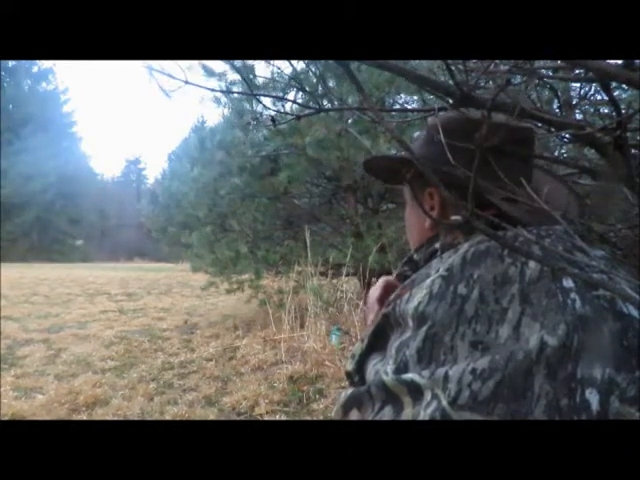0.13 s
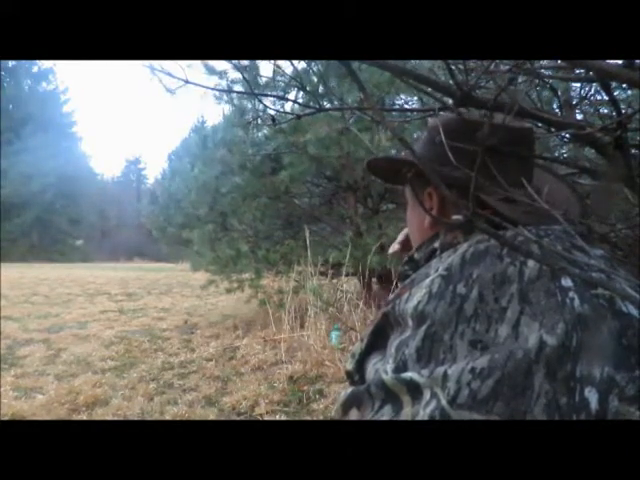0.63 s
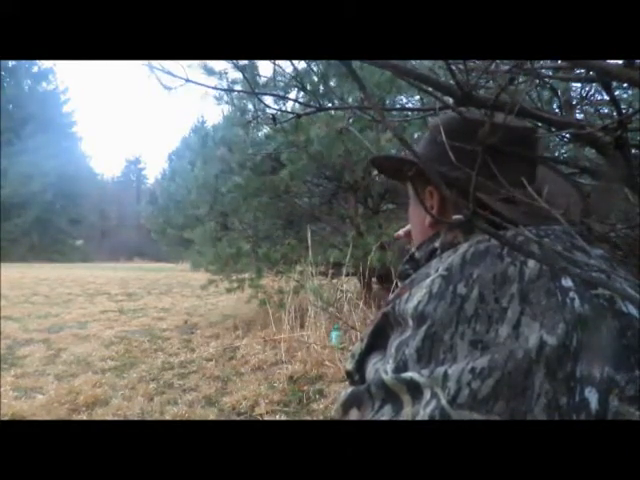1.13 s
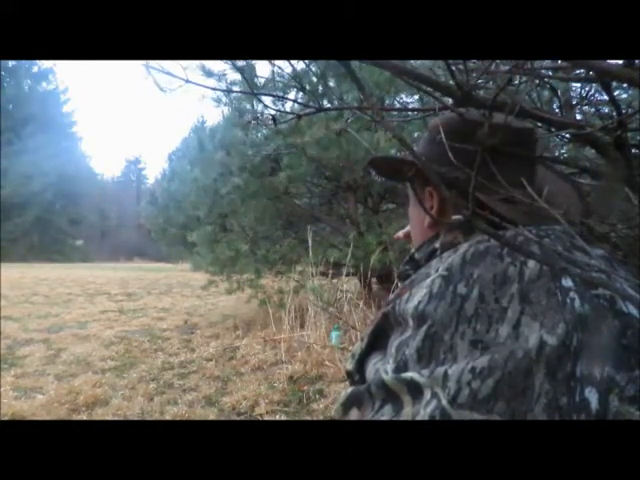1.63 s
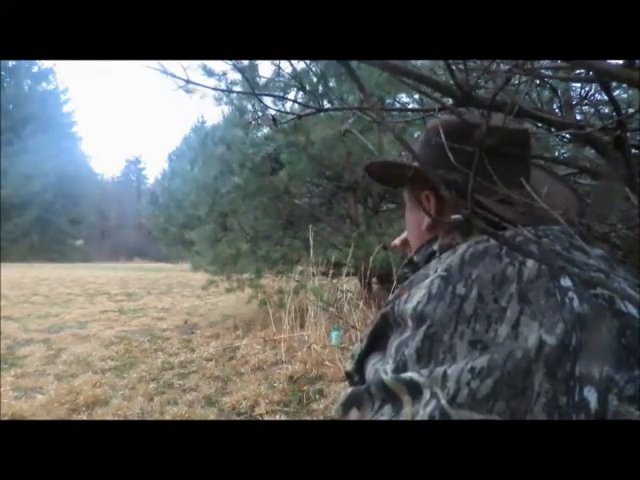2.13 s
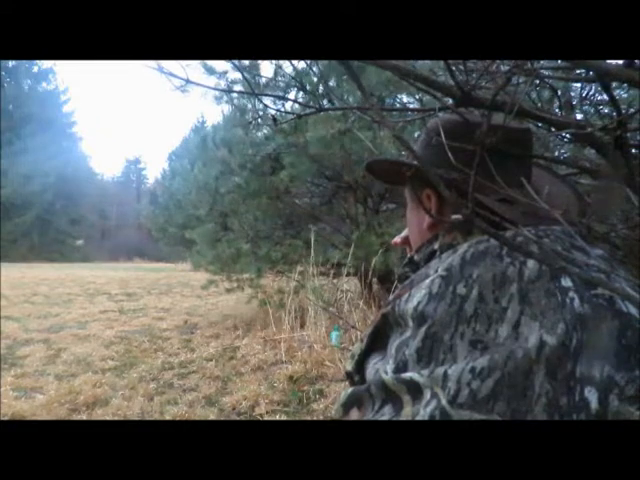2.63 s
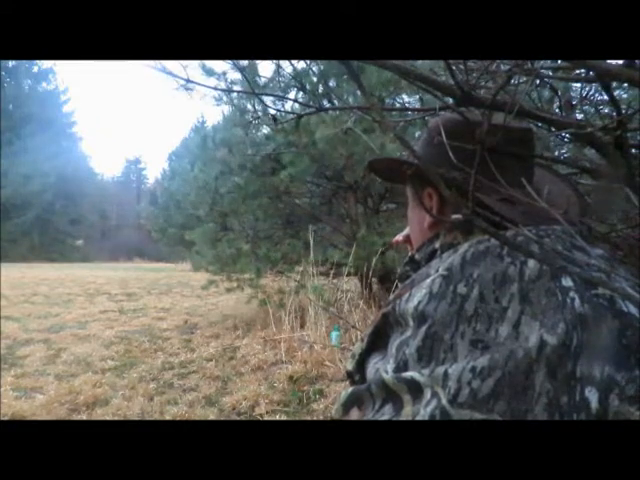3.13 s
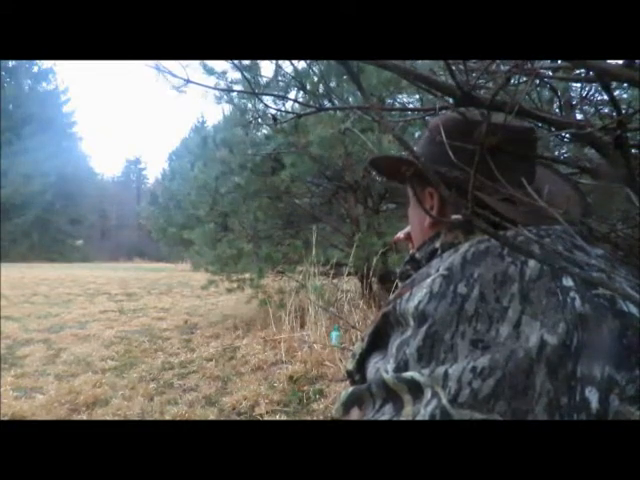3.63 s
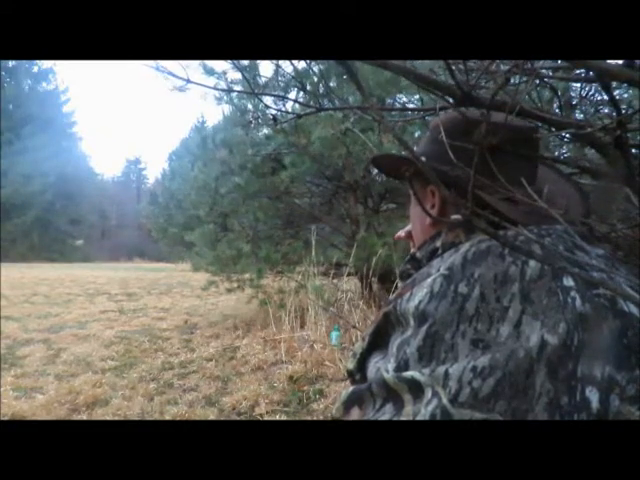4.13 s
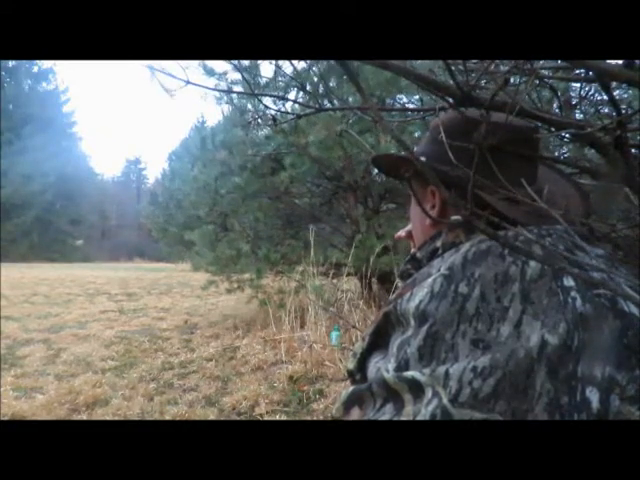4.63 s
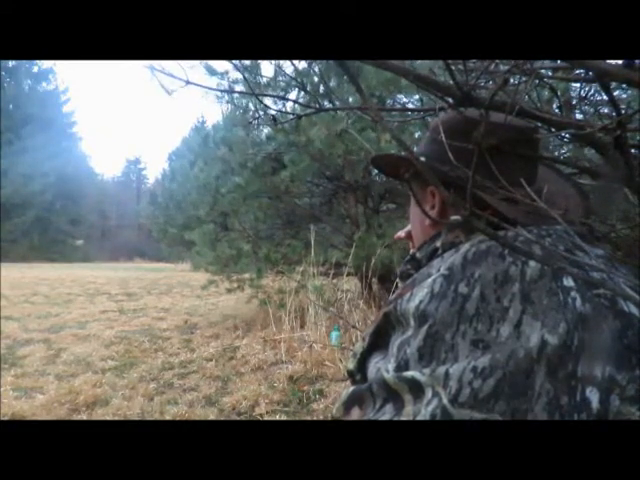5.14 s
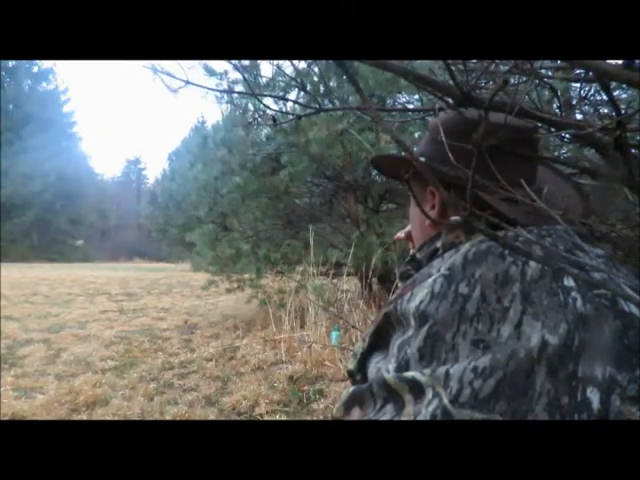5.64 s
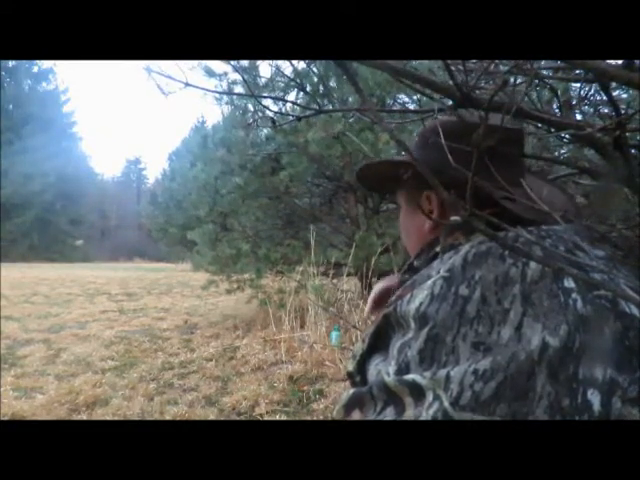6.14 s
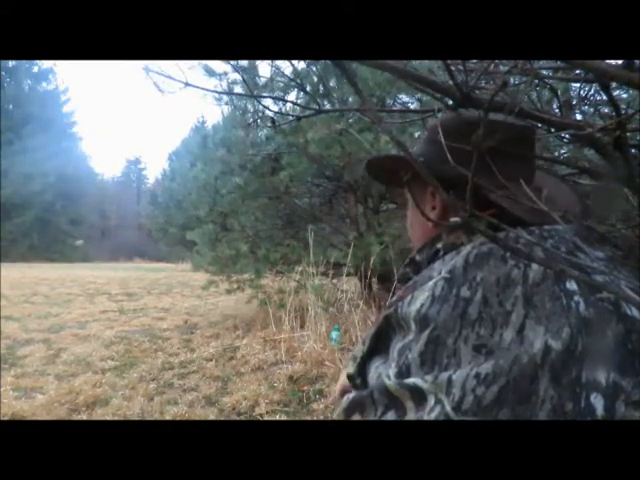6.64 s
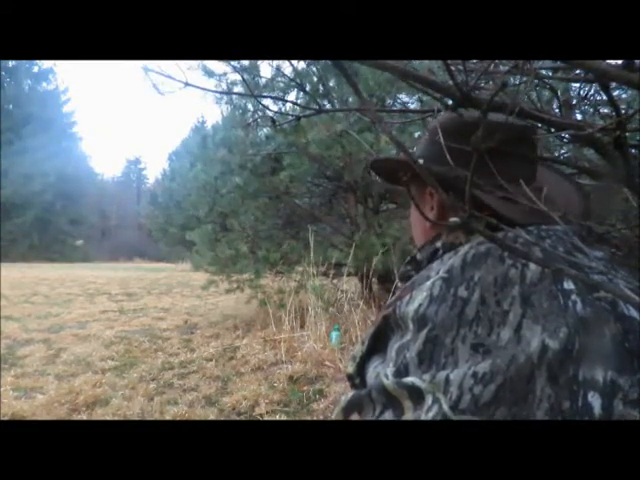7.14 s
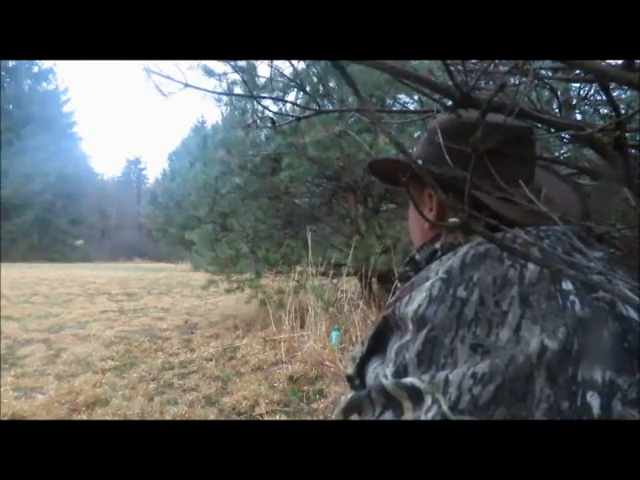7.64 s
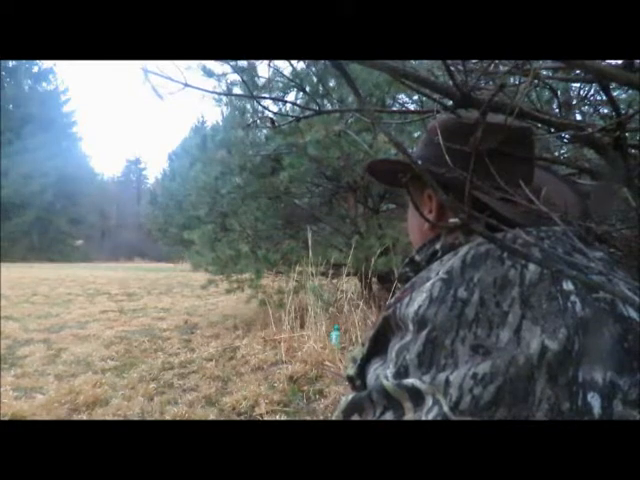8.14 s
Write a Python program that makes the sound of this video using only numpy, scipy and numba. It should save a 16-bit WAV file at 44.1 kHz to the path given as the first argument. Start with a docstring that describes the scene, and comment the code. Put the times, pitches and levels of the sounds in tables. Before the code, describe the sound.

A hunter's mouth turkey call gives six raspy yelps, then nine more, close up, over wind thumps and faint songbirds in an open field.

```python
"""At a field's edge a hunter works a hand-held turkey caller close to stereo microphones in the wind.
Gusts and eddies thump the ports from the start, over songbird whistles, a faint trill and a distant hush.
Six short yelps come first, then nine more: reed pulses ring a tube, and the tree line echoes them faintly.
After the last yelp the wind gusts again for about a second, the birds whistle on and another faint trill
is heard. The birds are gliding near-sines; wind, hush and trills are shaped noise."""
import sys
import numpy as np
from scipy import signal
from scipy.fft import rfft, irfft, next_fast_len
from scipy.io import wavfile
from scipy.ndimage import uniform_filter1d
from numba import njit

SR = 44100
rng = np.random.default_rng(int(sys.argv[2]) if len(sys.argv) > 2 else 0)


def dump_mix(stems):
    """Bounce the given channels to the path in sys.argv[1] as a 16-bit WAV at rate SR."""
    frames = np.atleast_2d(stems).T  # one column per channel
    limited = np.clip(frames, -1, 1)  # hard clip at full scale
    pcm = np.round(limited * 32767).astype(np.int16)
    wavfile.write(sys.argv[1], SR, pcm)


def voltage_ratio(decibels):
    """Convert decibels (scalar or array-like) to amplitude ratios, 20 dB per decade."""
    exponent = np.asarray(decibels, float) / 20
    return 10 ** exponent


N = 364707

# yelps of the caller: start_s, length_s, relative_peak_db, reed_rate_hz, slide_over_yelp_hz
YELPS = [(0.231, .1, -15.5, 624.4, 18), (0.564, .12, -12, 643.8, 35.5), (0.88, .119, -12, 646.6, 22.5),
         (1.197, .112, -12.5, 648, 25.5), (1.531, .109, -13, 638.4, 7), (1.828, .099, -12.5, 633.8, 30),
         (2.981, .057, -18.5, 550.8, 15), (3.176, .09, -11, 644.6, 45.5), (3.601, 0.1172, -11.5, 654, 54.5),
         (3.972, .155, -18.5, 628, -10.5), (4.37, 0.0985, -9.5, 641.5, 24),
         (4.695, .115, -15.5, 632.6, -4.5), (5.011, .107, -11.5, 623.8, -39),
         (5.341, 0.093, -15.5, 590.5, 0.5), (5.638, 0.11, -17.5, 588, -8)]
# how the caller is held: time_s, rasp (0-1), clearest_moment (share of the yelp),
# strong_weak_alternation (0-1), cupped_hand_opening (0-1), flick_on_letting_go_hz
GRIP = [(.28, 0.34, 0.79, 0.09, .05, 120), (.62, 0.78, 0.76, 0.06, .05, 150),
        (.94, 0.78, 0.78, .17, 0.3, 140.5), (1.25, 0.76, .7, .15, 0.51, 170),
        (1.581, 0.71, .5, 0.25, 0.4, 240.5), (1.88, 0.46, 0.75, 0.18, 0.52, 59.5),
        (3.01, 0.07, 0.13, 0.01, 0.4, 10), (3.22, 0.72, 0.51, 0.1, 0.72, 70.5),
        (3.66, .7, 0.53, 0.03, 0.52, 10), (4.05, .35, 0.27, 0.07, 0.84, 300),
        (4.42, .3, 0.46, 0.01, 0.82, -60), (4.75, 0.54, .4, 0.11, 0.78, -60),
        (5.07, .9, .3, .02, 0.65, -24.5), (5.39, 0.37, .45, .1, 0.69, -49.5),
        (5.7, 0.46, .42, 0.03, 0.85, -14.5)]
# moments when the reed catches: centre_s, half_span_s, level_change_db, rate_change_hz
CATCHES = [(.275, .012, -3.5, -95), (0.282, .005, -2.5, 1), (.633, 0.003, -2.5, 0),
           (0.908, .008, -2.5, -20), (0.95, 0.0055, -6.5, 0), (1.55, .004, -3, -20.5),
           (3.681, .005, -7.5, -0.5), (3.697, .007, 3, -1.5), (4.411, 0.01, -3.5, 0), (5.03, 0.0022, -6, 3),
           (5.396, 0.0092, -4.5, 1), (5.715, 0.0087, -3.5, -3)]
# main tube resonances, the fundamental's first: centre_hz, width_hz (second pass), relative_level_db
BODY_MODES = [(690, 503, 0), (1013, 140, -7.5), (1313, 326, 11), (1676, 370, -8)]
# upper tube resonances: centre_hz, width_hz (second pass), relative_level_db
BRIGHT_MODES = [(1950, 250, 2.5), (2280, 846, -1), (3162, 250, -7.5), (4220, 284, -9), (5140, 120, -27.5)]
# narrow passages colouring the leaking air: centre_hz, width_hz (second pass), relative_level_db
AIR_MODES = [(7370, 1100, -1), (8700, 820, -4.5), (10560, 1300, -6), (12700, 1700, -7)]
# slaps from the tree line: delay_s, level_db (against the dulled call)
ECHOES = [(0.041, -33), (.085, -43), (.2, -46), (.31, -48)]
# gusts on the ports: start_s, length_s, relative_strength_db
GUSTS = [(0, 0.057, -35.5), (0.148, 0.14, -26.5), (0.572, 0.15, -28.5), (0.839, 0.082, -17.5),
         (0.987, .12, -25.5), (1.129, 0.097, -29), (1.611, 0.07, -45.5), (2.783, 0.14, -43),
         (3.029, 0.23, -37.5), (4.121, 0.31, -42.5), (4.516, 0.35, -38), (4.9, 1., -43.5),
         (6.119, .24, -33.5), (6.443, .62, -43.5)]
# wind between gusts: time_s, relative_strength_db
LULL = [(0, -58), (1.4, -68.5), (2.6, -69.5), (3.5, -59.5), (7.1, -48.5), (8.26, -59.5)]
# single eddies on the ports: time_s (2 ms before the peak), peak_db (before the bass cut), pitch_hz (at the peak)
THUMPS = [(0.033, -13.5, 91), (0.182, -10.5, 149), (0.562, -29, 102), (0.673, -12, 130), (0.837, -7, 144),
          (0.855, -6, 219.6), (0.867, -27.5, 89.84), (0.995, -14.5, 129.8), (1.041, -12.5, 169.6),
          (1.055, -8, 217), (1.176, -14, 109), (4.118, -26, 159.2), (4.587, -21.5, 165.5),
          (4.681, -27, 163.1), (5.77, -26, 81.5), (6.222, -16.5, 111), (6.329, -20, 135),
          (7.032, -28.5, 97)]
# wind spectrum before filtering: frequency_hz, relative_density_db (per Hz)
WIND_SPECTRUM = [(29, -40.5), (50, -5), (97, 1.5), (233, -10), (477, -17.5), (600, -51.5), (780, -72.5),
                 (1320, -120)]
# whistles of songbirds: start_s, length_s, shape, from_hz, to_hz, level_db (before flutter and panning);
# an arch turns at its second pitch and comes back
BIRDS = [(0.335, 0.039, "arch", 2250, 2650, -52.5), (0.406, 0.063, "arch", 2150, 2200, -54),
         (.735, .033, "hook", 3460, 2620, -53), (.78, 0.075, "bend", 2930, 2030, -53.5),
         (0.804, 0.063, "arch", 3520, 4070, -61), (0.987, .044, "bend", 3000, 2130, -60),
         (1.3, 0.067, "hook", 2360, 2570, -52), (1.378, 0.076, "arch", 2260, 2560, -55.5),
         (1.454, 0.091, "hook", 2010, 2254, -55), (2.327, .11, "hook", 3020, 2543, -50.5),
         (2.428, .075, "arch", 2650, 2200, -50), (2.495, 0.073, "bend", 2780, 2773, -47),
         (2.6, 0.16, "bend", 2830, 2780, -68), (2.848, 0.04, "arch", 2140, 2393, -52),
         (2.874, 0.049, "bend", 3340, 2563, -56.5), (2.925, 0.078, "hook", 1780, 1950, -52.5),
         (3.028, 0.061, "hook", 3210, 2593, -57), (3.085, .048, "bend", 1890, 1921, -53),
         (3.104, 0.054, "bend", 2760, 2900, -60), (3.34, 0.054, "arch", 3400, 4010, -61),
         (3.728, .07, "arch", 2850, 3280, -60), (3.793, 0.099, "hook", 3000, 2096, -60.5),
         (3.886, 0.043, "arch", 2050, 2464, -56.5), (3.926, 0.062, "bend", 2010, 2040, -54),
         (4.479, 0.23, "arch", 1570, 1600, -58), (3.851, 0.1, "hook", 4400, 3760, -71.5),
         (4.199, .05, "bend", 3336, 2793, -66), (4.641, 0.046, "droop", 4020, 3574, -59),
         (5.238, 0.031, "droop", 2654, 2260, -50), (5.276, 0.044, "droop", 2602, 2064, -50),
         (5.53, 0.063, "bend", 1130, 1105, -49), (5.757, 0.053, "droop", 2690, 2010, -53.5),
         (5.833, 0.066, "arch", 2130, 2244, -50), (6.1, .053, "arch", 3540, 4030, -60),
         (6.191, 0.13, "arch", 2170, 3240, -55.5), (6.302, 0.027, "bend", 2120, 2110, -53),
         (6.31, 0.037, "bend", 4700, 4120, -62), (6.36, 0.051, "arch", 2050, 2370, -55),
         (6.397, 0.092, "bend", 2010, 1980, -57.5), (6.458, 0.17, "hook", 2910, 3195, -61.5),
         (6.721, 0.04, "hook", 3600, 2600, -52), (6.769, 0.067, "bend", 2780, 2120, -51),
         (6.89, 0.055, "bend", 2300, 2480, -52), (6.946, 0.092, "bend", 3150, 2070, -52),
         (7.318, .035, "bend", 2900, 2930, -61), (7.341, 0.071, "droop", 2280, 2650, -55.5),
         (7.389, 0.061, "bend", 2590, 2470, -51.5), (7.443, 0.068, "hook", 2010, 2574, -51.5),
         (7.513, 0.14, "hook", 2170, 2325, -51), (7.518, .039, "arch", 3750, 4400, -63),
         (7.898, 0.069, "bend", 1780, 1874, -55), (7.953, 0.043, "hook", 2700, 3205, -55),
         (8, 0.036, "hook", 2330, 2820, -50.5), (8.08, 0.051, "bend", 3150, 3190, -69),
         (8.06, 0.24, "hook", 1820, 1906, -58)]
# faint far-off trills: start_s, end_s, pitch_hz, chirp_rate_hz, level_db (hiss before the beat opens it)
TRILLS = [(0, 2.8, 6930, 9.8, -69.5), (6.8, 7.4, 5600, 14, -67)]
# course of the distant hush: time_s, relative_level_db
HUSH_LEVEL = [(0.0, -53.5), (3.16, -55.5), (3.29, -58), (7.92, -54), (8.27, -54)]
# hush spectrum before filtering: frequency_hz, relative_density_db (per Hz)
HUSH_SPECTRUM = [(18, -45), (36, -1), (132, 1.5), (355, -2.5), (815, 0), (1560, -7), (2250, -12),
                 (7430, -28), (13500, -38), (15000, -70)]

# loudness course of a yelp, in dB against its peak
ATTACK_S, RELEASE_S, FLICK_S = 0.0065, 0.0095, .04
SILENT_DB, ONSET_DB, ENDING_DB, CUTOFF_DB = -24.5, -5, -12.5, -38.5
# a taut reed starts louder; the ending lingers briefly
ONSET_DB_PER_HZ, HOLD_SHARE, TAIL_S, TAIL_DB = 0.0126, 0.26, 0.01, 6
# the rasp grows away from the clearest moment
CLEAR_RASP, RASP_GROWTH, RASP_POWER = .1, 2.4, 1.5
# a share of the flick also colours the onset, then settles
ONSET_FLICK, SETTLE_S = .2, .012
# a flicked reed clears and keeps only its main partial
FULL_FLICK_HZ, FLICK_POWER, FLICK_THINS_DB = 148.3, 3.0, -15.5
UNSTEADY_DB, ALTERNATION_SPREAD = 2, .6
# the fundamental fades when the reed is slack or alternates
LOW_DB, LOW_DB_PER_HZ, SLACK_HZ, ALTERNATION_LOSS_DB = -9.5, 0.7, 581, -17.5
SHUT_DB, OPEN_DB = -24, -10.5  # upper resonances against the main ones, cupped hand shut and open
SQUEAL_HZ, SQUEAL_WIDTH_HZ = 1425, 510
FIELD_T60_S, FIELD_DB = 1.0, -37
GUST_RISE_DB_PER_S, GUST_FALL_DB_PER_S = 250, 252.5
HOOK_SHARE, DROOP_POWER, SOFT_END_S = 0.24, 3.5, 0.0089  # bird glides and their soft ends


def caller():
    """Reed pulses ring the tube; in rough stretches the tube squeals at its own pitch against the reed."""
    start, length, _, rate, _ = np.transpose(YELPS)
    when, *grip = np.transpose(GRIP)
    rasp, clearest, alternation, opening, flick = (np.interp(start + length / 2, when, g) for g in grip)
    yelps = [yelp(*row, *held) for row, *held in zip(YELPS, rasp, clearest, flick)]
    hz, db, rough, thin = curve(np.concatenate(yelps))
    db = db + UNSTEADY_DB * walk(60)
    rough = np.clip(rough, 0, 1)

    t = np.arange(N) / SR
    which = np.clip(np.searchsorted(start, t) - 1, 0, None)  # latest yelp at each sample
    blowing = (t > start[0]) & (t < (start + length)[which])
    blowing = uniform_filter1d(1. * blowing, int(.003 * SR))

    slack_db = LOW_DB_PER_HZ * np.minimum(rate - SLACK_HZ, 0)
    low_db = (LOW_DB + slack_db + ALTERNATION_LOSS_DB * alternation)[which] + FLICK_THINS_DB * thin
    bright_db = (SHUT_DB + (OPEN_DB - SHUT_DB) * opening)[which]

    double = np.clip(alternation[which] * (1 + ALTERNATION_SPREAD * walk(45)), 0, 1)
    jitter, shimmer = 0.003 + .07 * rough, .04 + .55 * rough
    chance = rng.standard_normal((N // 40, 2))
    pulses = reed(hz, jitter, shimmer, .25 * double, 2.0 * double, chance)
    pulses = level(pulses - pulses.mean(), 0)
    squeal = even(band(rng.standard_normal(N), SQUEAL_HZ, SQUEAL_WIDTH_HZ), 0.0033)
    # the reed chops the squeal, which throws side tones one reed rate above and below
    drive = pulses + rough * squeal * (.5 + 0.37 * pulses)

    fundamental = even(tube(drive, BODY_MODES[:1]), 0.063)
    body = even(tube(drive, BODY_MODES[1:]), .016) + voltage_ratio(low_db) * fundamental
    body = signal.sosfilt(signal.butter(4, 1900, fs=SR, output="sos"), body)

    breathy = pulses + .9 * rng.standard_normal(N)
    leak = level(tube(breathy, AIR_MODES), -26.5) * voltage_ratio(2 * walk(50))
    upper = voltage_ratio(bright_db) * even(tube(drive, BRIGHT_MODES), 0.068) + voltage_ratio(0.89 * bright_db) * leak
    # the upper partials need a few ms of pressure to build up
    keep = np.exp(-1 / (0.003 * SR))
    built = np.minimum(signal.lfilter([1 - keep], [1, -keep], voltage_ratio(db) * blowing), voltage_ratio(db))
    return blowing * (voltage_ratio(db) * body + built * upper * voltage_ratio(FLICK_THINS_DB * thin))


def yelp(start, length, db, hz, slide, rasp, clearest, flick):
    """One breath through the reed as rows: time_s, rate_hz, level_db, roughness, thinning (0-1)."""
    last = length - RELEASE_S
    peak = np.clip(clearest, .25, .7) * length  # loudest near the clearest moment
    hold = HOLD_SHARE * length * (1 - rasp / 2)
    s = np.linspace(0, length, num=120)

    letting_go = np.clip(1 - (length - s) / FLICK_S, 0, 1)
    flicked = ONSET_FLICK * np.exp(-s / SETTLE_S) + letting_go ** FLICK_POWER
    rate = hz + slide * (s / length - .5) + flick * flicked

    hold_start = max(peak - hold, 2 * ATTACK_S)
    hold_end = min(peak + hold, last - TAIL_S - .004)
    times = [0, ATTACK_S, hold_start, hold_end, last - TAIL_S, last, length]
    onset_db = ONSET_DB + ONSET_DB_PER_HZ * flick
    levels = [SILENT_DB, onset_db, 0, 0, ENDING_DB + TAIL_DB, ENDING_DB, CUTOFF_DB]
    shape = np.interp(s, times, levels)

    for when, span, change_db, change_hz in CATCHES:
        catch = np.exp(-((start + s - when) / span) ** 4)
        shape = shape + change_db * catch
        rate = rate + change_hz * catch

    thin = letting_go * np.clip(flick / FULL_FLICK_HZ, 0, 1)
    growth = CLEAR_RASP + RASP_GROWTH * abs(s / length - clearest) ** RASP_POWER
    rough = rasp * np.minimum(growth, 1) * (1 - thin)
    return np.transpose([start + s, rate, db + shape, rough, thin])


@njit
def reed(hz, jitter, shimmer, lag, dip, chance):
    """A smooth pulse each cycle; lengths and sizes scatter, and every other cycle may be late and weak."""
    pulses, phase, k = np.zeros(len(hz) + 16), 0., 0
    for i in range(len(hz)):
        side = 1. - 2 * (k % 2)
        step = hz[i] / SR * max(1 + jitter[i] * chance[k, 0] + lag[i] * side, .4)
        phase += step
        if phase >= 1:
            phase, k = phase - 1, k + 1
            size = max(1 + shimmer[i] * chance[k, 1] + dip[i] * side, 0.)
            # a windowed sinc places the pulse between samples
            for j in range(16):
                u = j - 7 + phase / step - 1
                pulses[i + j] += size * np.sinc(.8 * u) * (.5 + .5 * np.cos(np.pi * u / 8))
    return pulses[8:len(hz) + 8]


def tube(x, modes):
    """Resonances side by side, each applied twice for dark valleys between them."""
    out = 0
    for k, (hz, width, db) in enumerate(modes):
        ringing = band(band(x, hz, 0.92 * width), hz, width)
        out = out + (-1) ** k * voltage_ratio(db) * ringing
    return out


def field(x):
    """A few slaps from the trees and a thin dull tail, different on each side."""
    t = np.arange(SR) / SR
    tail = rng.standard_normal((2, SR)) * voltage_ratio(-60 * t / FIELD_T60_S) * np.minimum(t / 0.017, 1)
    response = level(tail, FIELD_DB) / np.sqrt(SR)
    for delay, db in ECHOES:
        response[:, int(delay * SR)] += voltage_ratio(db)
    return signal.fftconvolve(band(x, 1200, 900)[None], response, axes=1)[:, :N]


def wind():
    """Turbulence in lumpy bursts, brighter in strong gusts; eddies reach the ports one after the other."""
    gust_db = gusts()
    raw = noise(WIND_SPECTRUM) * voltage_ratio(6 * walk(45))
    top = signal.sosfilt(signal.butter(2, 230, "high", fs=SR, output="sos"), raw)
    mid, own = raw - top + top * voltage_ratio(0.043 * np.minimum(gust_db + 23, 0))
    # a quarter-cycle lag between middle and side spreads the wind over both ports
    lagged = signal.hilbert(mid, next_fast_len(N))[:N].imag
    side = signal.sosfiltfilt(signal.butter(1, 90, "high", fs=SR, output="sos"), lagged + .3 * own)
    out = (level(mid, 0) + level(side, -1) * np.array([[1], [-1]])) * voltage_ratio(gust_db - 2.5)
    t = np.arange(-.015, .03, 1 / SR)
    for s, db, hz in THUMPS:
        # an eddy sweeps over one port, then the other, slowing as it goes
        phase = 2 * np.pi * hz * (t - 8 * t ** 2) + np.array([[.8], [-.8]])
        i = int((s - .013) * SR)
        out[:, i:i + len(t)] += voltage_ratio(db) * np.exp(-(t * hz / 0.73) ** 2) * np.cos(phase)
    return signal.sosfilt(signal.butter(2, 50, "high", fs=SR, output="sos"), out)


def gusts():
    """Wind strength in dB: each gust rises, holds and falls back to the lull."""
    t = np.arange(N) / SR
    each = []
    for start, length, db in GUSTS:
        rise = GUST_RISE_DB_PER_S * np.minimum(t - start, 0)
        fall = GUST_FALL_DB_PER_S * np.minimum(start + length - t, 0)
        each.append(db + np.minimum(rise, fall))
    return np.maximum(np.max(each, axis=0), curve(LULL)[0])


def birds():
    """Near-sine whistles with soft ends, smeared by the distance they cross."""
    out = np.zeros((2, N + SR))
    pans_db = rng.uniform(-2, 2, len(BIRDS))
    for (start, length, shape, from_hz, to_hz, db), pan_db in zip(BIRDS, pans_db):
        u = np.linspace(0, 1, int(length * SR))
        glide = {"arch": np.sin(np.pi * u),
                 "hook": 1 - np.exp(-u / HOOK_SHARE),  # moves at once, then settles
                 "bend": np.sin(np.pi * u / 2) ** 2,
                 "droop": u ** DROOP_POWER}[shape]  # moves late
        ends = np.clip(np.minimum(u, 1 - u) * length / SOFT_END_S, 0, 1)
        phase = 2 * np.pi * np.cumsum(from_hz + (to_hz - from_hz) * glide) / SR
        tone = np.sqrt(2) * voltage_ratio(db) * ends * np.sin(phase)
        i = int(start * SR)
        out[:, i:i + len(u)] += tone * voltage_ratio(np.array([[pan_db], [-pan_db]]) / 2)
    out = out[:, :N]
    tail = rng.standard_normal((2, SR // 2)) * voltage_ratio(-60 * np.arange(SR // 2) / SR / .5)
    wet = signal.fftconvolve(out, level(tail, -4.0) / np.sqrt(SR // 2), axes=1)[:, :N]
    return out * voltage_ratio(4.9 * walk(60)) + wet


def trills():
    """Short bursts of narrow hiss at a steady beat."""
    t, out = np.arange(N) / SR, 0
    for start, end, hz, rate, db in TRILLS:
        beat = np.maximum(np.cos(2 * np.pi * rate * t), 0) ** 2 * (t > start) * (t < end)
        hiss = band(band(rng.standard_normal((2, N)), hz, 700), hz, 700)
        out = out + beat * level(hiss, db)
    return out


def hush():
    """Far traffic and leaves: smooth noise, partly alike on both sides, drifting a little."""
    mid, side = noise(HUSH_SPECTRUM) * voltage_ratio(.8 * walk(6))
    dull = signal.sosfilt(signal.butter(1, 4500, fs=SR, output="sos"), side)
    side = signal.sosfilt(signal.butter(1, 150, "high", fs=SR, output="sos"), side - .5 * dull)
    both = mid + side * np.array([[1], [-1]])
    return both * voltage_ratio(curve(HUSH_LEVEL)[0] + 5.5)


def level(x, db):
    """Scale to an rms level."""
    return x * voltage_ratio(db) / np.sqrt(np.mean(x ** 2))


def curve(rows):
    """Columns of a table after its time column, one value a sample."""
    s, *columns = np.transpose(rows)
    return [np.interp(np.arange(N) / SR, s, c) for c in columns]


def band(x, hz, width):
    """Two-pole resonance, gain 1 at the centre."""
    return signal.lfilter(*signal.iirpeak(hz, hz / width, fs=SR), x)


def even(x, window_s):
    """Divide by the slow envelope, leaving the quick flutter."""
    return x / np.sqrt(uniform_filter1d(x ** 2, int(window_s * SR)))


def noise(points, channels=2):
    """Unrelated noises with a given spectrum, at rms 1 overall."""
    hz, db = np.transpose(points)
    size = next_fast_len(N)
    bins_hz = np.arange(size // 2 + 1) * SR / size
    gain = voltage_ratio(np.interp(np.log(bins_hz + 1), np.log(hz), db))
    return level(irfft(rfft(rng.standard_normal((channels, size))) * gain, size)[:, :N], 0)


def walk(rate):
    """Random levels held 1 / rate s and slewed twice."""
    k = int(SR / rate)
    held = np.repeat(rng.standard_normal(N // k + 1), k)
    return uniform_filter1d(uniform_filter1d(held, k), k)[:N]


def scene():
    """The caller close and a little left of centre, the field, birds, wind and distance around it."""
    call = caller()
    treble = signal.sosfilt(signal.butter(2, 6000, "high", fs=SR, output="sos"), call)
    # a short bounce off the hunter, strongest in the treble, enters the two sides with opposite sign
    bounce = np.roll(voltage_ratio(-20.5) * call + voltage_ratio(-12) * treble, int(0.00054 * SR))
    near = call * voltage_ratio(np.array([[.25], [-.25]])) + bounce * np.array([[1], [-1]])
    return near + field(call) + birds() + trills() + wind() + hush()


def band_limit(x):
    """A steep low-pass at the top of the band."""
    return signal.sosfilt(signal.butter(12, 15410, fs=SR, output="sos"), x)


def record(dry):
    """The microphone drops the deepest bass."""
    mix = signal.sosfilt(signal.butter(2, 42, "high", fs=SR, output="sos"), dry)
    return band_limit(mix)


dry = scene()
out = record(dry)
dump_mix(out)
```